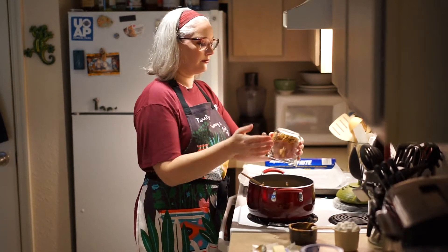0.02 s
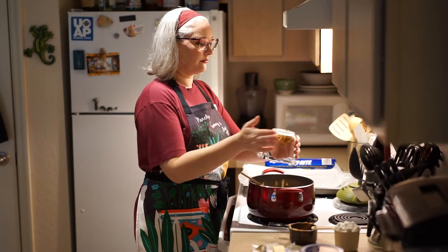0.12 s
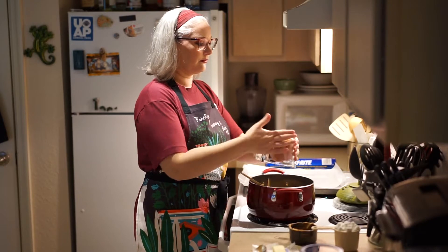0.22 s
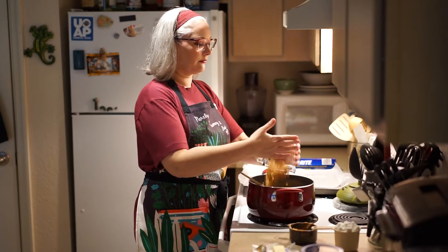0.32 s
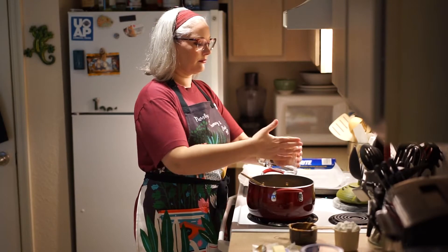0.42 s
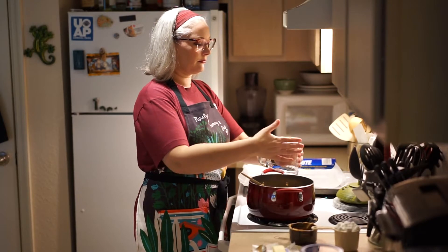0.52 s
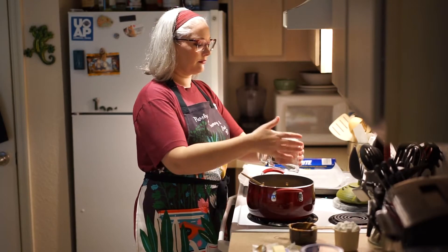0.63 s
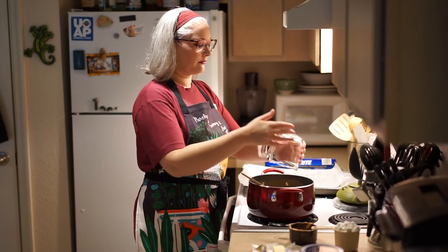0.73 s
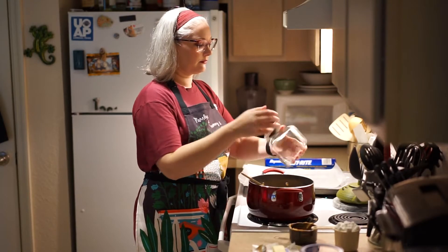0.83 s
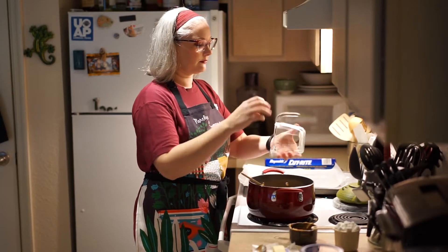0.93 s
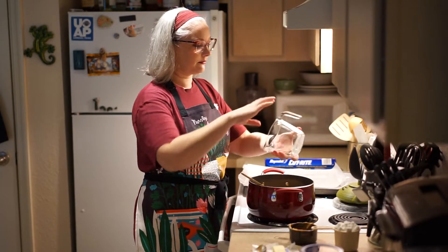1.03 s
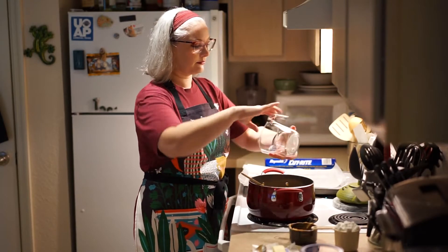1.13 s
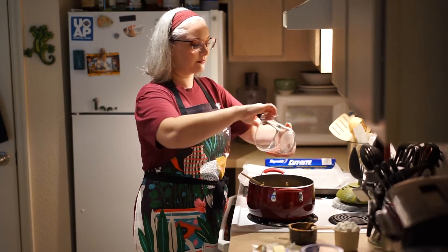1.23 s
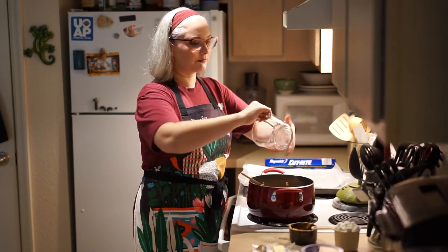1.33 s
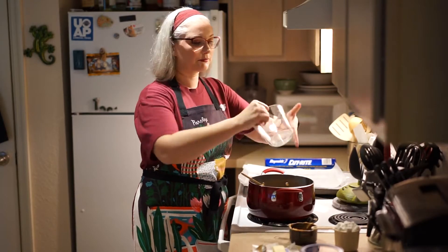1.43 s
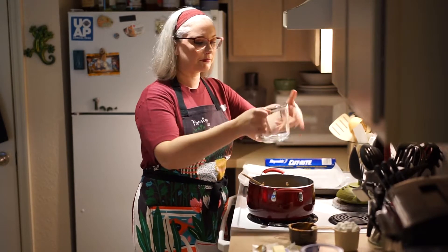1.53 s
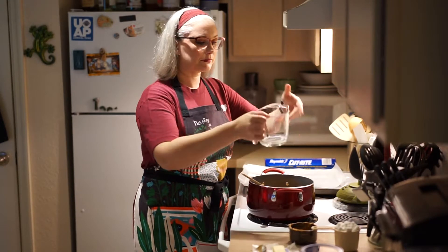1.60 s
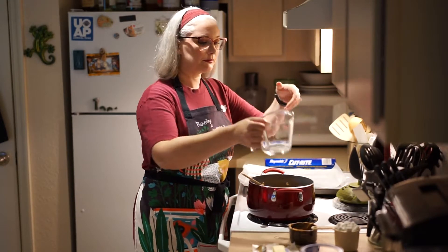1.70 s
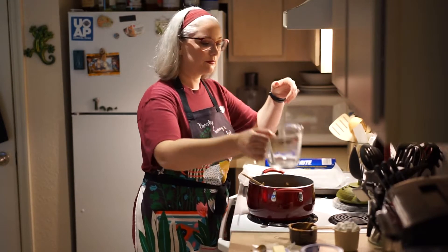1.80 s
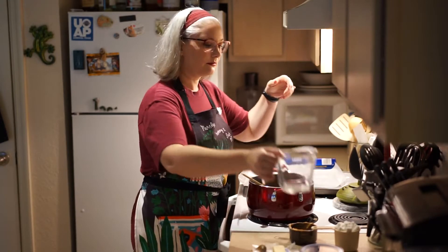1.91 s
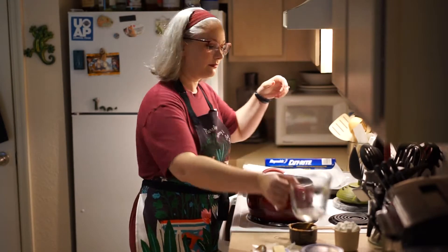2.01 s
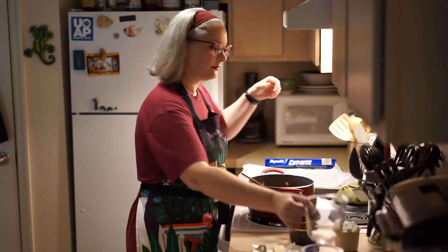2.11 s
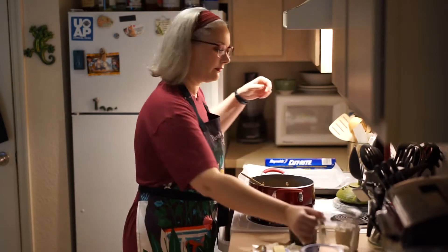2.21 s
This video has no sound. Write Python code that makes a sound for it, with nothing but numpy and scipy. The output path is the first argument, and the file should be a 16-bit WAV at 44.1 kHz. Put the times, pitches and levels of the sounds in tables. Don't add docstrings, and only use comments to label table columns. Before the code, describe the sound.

Hard chips pour from a glass cup into a metal pot. Faint sliding rattles begin at 0.18 seconds, a sharp damped knock with tiny bounces hits the cup at 0.23, then the heap crashes into the pot at 0.40-0.45, ringing briefly. A bright slip and last ticks follow around 0.52-0.6. Faint taps and rustle come near 2.0-2.2, over steady refrigerator hum and low room rumble.

```python
import sys
import numpy as np
from scipy import signal
from scipy.io import wavfile

SR = 44100
rng = np.random.default_rng(int(sys.argv[2]) if len(sys.argv) > 2 else 0)


def rack_gain(trim_db):
    fader = np.asarray(trim_db, float)
    return 10 ** (fader / 20)


def transcribe(u):
    v = np.clip(np.atleast_2d(u).T, -1, 1)
    q = np.round(v * 32767).astype(np.int16)
    wavfile.write(sys.argv[1], SR, q)


N = 101430


def rms_one(x):
    return x / np.sqrt(np.mean(x ** 2) + 1e-20)


def at_hz(points, hz, column=1):
    table = np.array(points)
    return np.interp(np.log(hz), np.log(table[:, 0]), table[:, column])


def pan(db):
    return rack_gain(db * np.array([[0.5], [-0.5]]))


def stereo(mid, side, alike):
    return np.sqrt(1 + alike) * mid + np.sqrt(1 - alike) * side * [[1], [-1]]


def high_pass(x, order, hz):
    return signal.sosfilt(signal.butter(order, hz, "high", fs=SR, output="sos"), x)


def bands():
    edges = 22 * 2 ** np.arange(0, 9.6, 0.5)
    return [(np.sqrt(low * high), signal.butter(2, [low, high], "band", fs=SR, output="sos"))
            for low, high in zip(edges, edges[1:])]


def ring(clicks, hz, t60):
    radius = rack_gain(-60 / (t60 * SR))
    turn = 2 * np.pi * hz / SR
    return signal.lfilter([0, np.sin(turn)], [1, -2 * radius * np.cos(turn), radius * radius], clicks + 1e-18)


# [f/Hz, level/dB per Hz]
AIR = [(15, -38), (30, -26), (60, -5.5), (150, -5), (400, -13), (900, -15.5), (1100, -18), (16000, -36.5)]
# [f/Hz, left minus right level/dB]
AIR_PAN = [(60, 1), (300, -2), (700, .8), (3000, -1.5), (12000, 0)]
# [f/Hz, left-right likeness]
LIKENESS = [(60, 0.83), (130, 0.77), (290, 0.77), (640, 0.52), (1410, 0.6), (3100, -0.24), (6820, 0.1),
            (15000, -0.22)]
AIR_DB = -50


def air():
    out = 0
    white = rng.standard_normal((2, 2, N + SR))
    for k, (hz, sos) in enumerate(bands()):
        mid, side = signal.sosfilt(sos, white[k % 2])[:, SR:]
        alike = np.clip(at_hz(LIKENESS, hz), -1, 1)
        out = out + rack_gain(at_hz(AIR, hz)) * pan(at_hz(AIR_PAN, hz)) * stereo(mid, side, alike)
    return rack_gain(AIR_DB - 2.0) * rms_one(out)


# [f/Hz, level/dB]
TONES = [(46.5, -67), (93.6, -56), (120, -56), (338.6, -66), (360, -66.5)]
# [f/Hz, width/Hz, level/dB]
HUM = [(49, 6.9, -57.5), (93.36, 4.3, -56.5), (126.6, 14, -61), (258, 15.57, -59.5), (345.8, 7, -64.5),
       (418.7, 8.1, -68.5), (482.6, 97, -57.5), (664, 58, -61), (830, 18.7, -65.5), (857, 12, -69)]


def refrigerator():
    t = np.arange(N) / SR
    out = 0
    for hz, db in TONES:
        out = out + rack_gain(db) * np.sqrt(2) * np.sin(2 * np.pi * (hz * t + rng.random()))
    for hz, width_hz, db in HUM:
        t60 = np.log(1000) / np.pi / width_hz
        mid, side = [rms_one(ring(noise, hz, t60)[SR:]) for noise in rng.standard_normal((2, N + SR))]
        out = out + rack_gain(db) * (mid + 0.11 * side * [[1], [-1]])
    return out


# [f/Hz, dying time t60/s, wet level/dB]
KITCHEN = [(278, 0.9, -15), (980, 0.35, 1), (3000, 0.53, -6), (7000, 0.33, 1.5), (13800, 0.23, 3.5)]
FIRST_ECHO_S, ECHO_LIKENESS = 0.0013, 0.96
EARLY_DB, EARLY_T60_S = -0.5, 0.054


def kitchen(x):
    t = np.arange(SR // 2 + SR // 4) / SR
    early = rack_gain(EARLY_DB - 60 * t / EARLY_T60_S)
    white = rng.standard_normal((2, 2, len(t)))
    echoes = 0
    for k, (hz, sos) in enumerate(bands()[6:]):
        alike = np.clip(ECHO_LIKENESS * at_hz(LIKENESS, hz), 0, 1)
        t60 = at_hz(KITCHEN, hz)
        mid, side = signal.sosfilt(sos, white[k % 2])
        wet = rack_gain(at_hz(KITCHEN, hz, column=2)) * np.sqrt(np.log(1000) / t60 / SR)
        echoes = echoes + stereo(mid, side, alike) * wet * (rack_gain(-60 * t / t60) + early)
    onset = np.clip(t / FIRST_ECHO_S - 1, 0, 1)
    return signal.fftconvolve(x[None], echoes * onset, axes=1)[:, :N]


def contacts(per_s, uneven):
    sizes = rack_gain(uneven * np.minimum(rng.exponential(1, N), 4.0)) * rng.choice([-1, 1], N)
    return rms_one(sizes * (rng.random(N) < per_s / SR))


def chips(clicks, spectrum, cycles):
    pitches = np.geomspace(spectrum[0][0], spectrum[-1][0], 36)
    dealt = rng.integers(0, len(pitches), N)
    gains = rack_gain(at_hz(spectrum, pitches)) * pitches ** 2
    power = np.mean(gains ** 2 * (cycles / pitches) ** 3) * SR ** 3 / 16 / np.log(1000) ** 3 / 2
    out = np.zeros(N)
    for k, (hz, gain) in enumerate(zip(pitches, gains)):
        t60 = cycles / hz
        swell = ring(clicks * (dealt == k), hz, t60)
        out += gain * ring(swell, hz, t60)
    return out / np.sqrt(power)


# [t/s, peak level/dB, dying time t60/s]
SLIDES = [
    (0.1782, -55, 0.23),
    (0.2025, -47.5, 0.16),
    (0.233, -44.5, 0.18),
    (0.3603, -49, 0.053),
    (0.519, -28, 0.025),
    (0.529, -40, 0.21),
    (2.185, -65.5, .25),
]
# [f/Hz, level/dB per Hz]
CHIP_IN_CUP = [(1500, -18), (2800, -16), (3800, 6), (5000, -2.5), (6200, -4.5), (8300, -7), (11000, -24),
               (15500, -18)]
# [f/Hz, level/dB per Hz]
CHIP_ON_GLASS = [(1000, -12), (2500, 14), (3800, -16), (5200, 8), (7000, 32), (9000, 9.5), (11500, -24),
                 (15500, -44)]
SLIDE_PER_S, SLIDE_UNEVEN_DB, SLIDE_CYCLES = 9000, 2.5, 4.1
CUP_EMPTY_S = 0.3


def slides():
    t = np.arange(N) / SR
    level = sum(rack_gain(db - 60 * np.maximum(t - s, 0) / t60) * (t >= s) for s, db, t60 in SLIDES)
    clicks = contacts(SLIDE_PER_S, SLIDE_UNEVEN_DB) * level
    deep = (t < CUP_EMPTY_S) | (t > 1)
    in_cup = chips(clicks * deep, CHIP_IN_CUP, SLIDE_CYCLES)
    on_glass = chips(clicks * ~deep, CHIP_ON_GLASS, SLIDE_CYCLES)
    return in_cup + on_glass


# [t/s, level/dB]
KNOCKS = [
    (.2328, -14.5),
    (.2352, -21.5),
    (0.238, -22.5),
    (0.2406, -21.5),
    (.2440, -25.5),
    (.2505, -29),
    (.2560, -30),
]
# [f/Hz, level/dB]
CUP = [(380, -10), (620, -10.5), (820, -16), (1075, -6.5), (1280, -9), (1370, 1), (1560, -19), (1690, 3),
       (1850, -6), (2010, 3), (2290, 4), (2600, -7), (3050, -8), (3680, -1)]
CUP_CYCLES = 30
CRACK_DB, CRACK_HZ, CRACK_T60_S = -25, 3000, 0.0051


def knock():
    s, db = np.transpose(KNOCKS)
    at = (s * SR).astype(int)
    modes = np.zeros(N)
    for k, (hz, mode_db) in enumerate(CUP):
        sign = (-1) ** (k // 2)
        clicks = np.zeros(N)
        clicks[at] = rack_gain(db + mode_db - 9.5 + rng.normal(0, 2, len(s))) * sign
        modes += ring(clicks, hz, CUP_CYCLES / max(hz, 1300))
    t = np.arange(N) / SR - s[0]
    fade = rack_gain(db[0] + CRACK_DB - 60 * np.maximum(t, 0) / CRACK_T60_S) * (t >= 0)
    crack = rng.standard_normal(N) * fade
    return modes + high_pass(crack, 2, CRACK_HZ)


# [t/s, peak level/dB, f/Hz]
TICKS = [(0.177, -50, 4080), (.1790, -48, 9000), (.2040, -51, 4220), (0.242, -25.5, 6400),
         (.3607, -61, 7400), (0.3975, -19.5, 7500), (.4005, -23, 4200), (0.406, -19, 7600),
         (.4235, -19.5, 1850), (.4120, -33.5, 468), (.4350, -25.5, 448), (.4380, -34, 800),
         (.4560, -28, 462.4), (0.518, -28, 7000), (.5200, -39, 8600), (0.521, -26, 6640),
         (.5140, -42, 1080), (.5850, -46, 1080), (.5470, -24, 7330), (1.985, -46.5, 1460),
         (1.996, -46, 1380), (2.011, -62, 1900)]
TICK_CYCLES = 28


def ticks():
    out = np.zeros(N)
    for s, db, hz in TICKS:
        cycle = int(round(SR / hz))
        clicks = np.zeros(N)
        clicks[int(s * SR) + np.arange(3) * cycle] = rack_gain(db - 9)
        out += ring(clicks, hz, TICK_CYCLES / hz)
    return out


# [t/s, level/dB]
POUR = [
    (0.3972, -22),
    (.403, -36),
    (.411, -18),
    (.418, -28.5),
    (.424, -18),
    (.445, -27.5),
    (.47, -36),
    (.51, -43.5),
    (.56, -49),
]
# [f/Hz, level/dB per Hz]
CHIP_ON_POT = [(300, -25), (700, -34.5), (1500, -9), (2800, 2.5), (4500, 5), (7500, -2.5), (11000, -17),
               (15500, -59)]
# [f/Hz, level/dB, dying time t60/s]
POT = [(375, -39, .04), (446.6, -2, 0.06), (800, -11.5, 0.067), (1080, -17.5, 0.37), (1583, -7.5, .12),
       (1896, 1, .08), (2890, 3.5, 0.035), (3388, -1, 0.09), (2460, -3, 0.099), (3830, 7.5, 0.054),
       (4528, -34, 0.05), (5370, -12, 0.04), (5850, -11, .05), (7540, -4, 0.1)]
POUR_PER_S, POUR_UNEVEN_DB, POUR_CYCLES = 9000, 2.5, 5.67
POT_RING_DB, TRICKLE_FADE_DB_PER_S = -5, 348
HEAP_LAG_S, HEAP_BELOW_HZ = 0.014, 900


def pour():
    t = np.arange(N) / SR
    s, db = np.transpose(POUR)
    trickle_fade = TRICKLE_FADE_DB_PER_S * np.maximum(t - s[-1], 0)
    level = rack_gain(np.interp(t, s, db) - trickle_fade) * (t >= s[0])
    clicks = contacts(POUR_PER_S, POUR_UNEVEN_DB) * level
    pot = np.zeros(N)
    for hz, mode_db, t60 in POT:
        lag = int(HEAP_LAG_S * SR) * (hz < HEAP_BELOW_HZ)
        hits = np.roll(clicks, lag) * rng.standard_normal(N)
        pot += rack_gain(mode_db) * ring(hits, hz, t60)
    return chips(clicks, CHIP_ON_POT, POUR_CYCLES) + rack_gain(POT_RING_DB - 28.5) * pot


SOURCE_PAN_DB = -1.9
SMALLEST_HZ = 320


def scene():
    near = high_pass(pour() + slides() + ticks() + knock(), 4, SMALLEST_HZ)
    return (near + kitchen(near)) * pan(SOURCE_PAN_DB) + air() + refrigerator()


def low_pass(x):
    return signal.sosfilt(signal.butter(12, 16490, fs=SR, output="sos"), x)


TOP = 0.5
CUTOFF_HZ = 15900


def record(dry):
    rounded = TOP * np.tanh(dry / TOP)
    treble_cut = signal.cheby2(14, 60, CUTOFF_HZ + 400, fs=SR, output="sos")
    return low_pass(signal.sosfilt(treble_cut, rounded))


dry = scene()
out = record(dry)
transcribe(out)
```